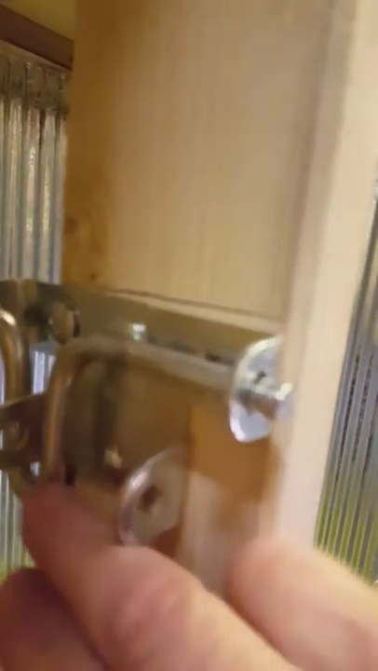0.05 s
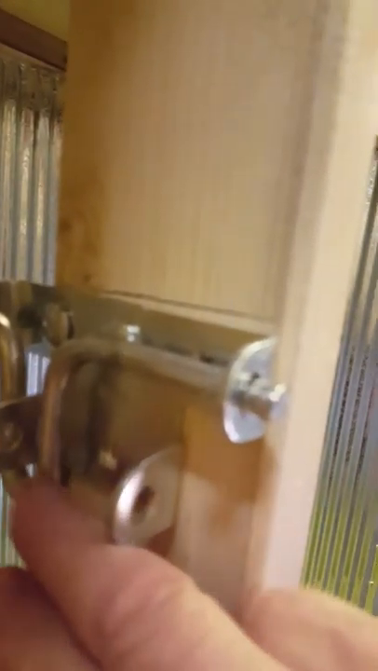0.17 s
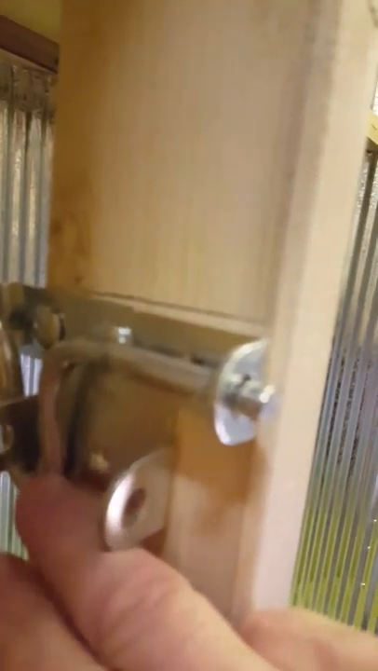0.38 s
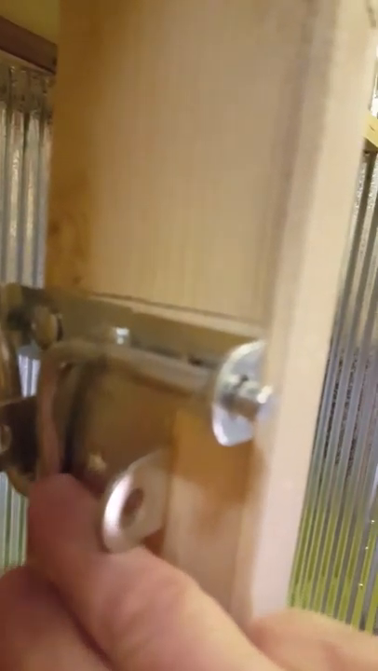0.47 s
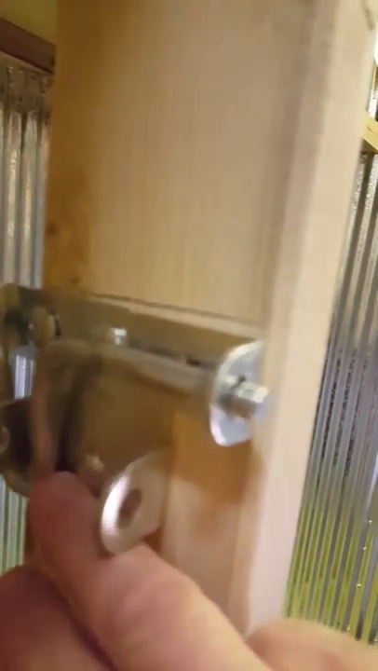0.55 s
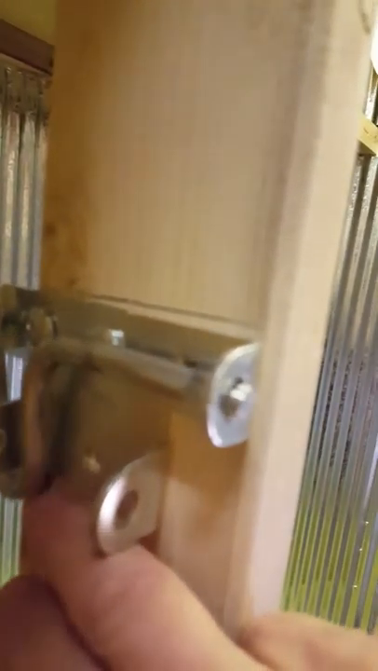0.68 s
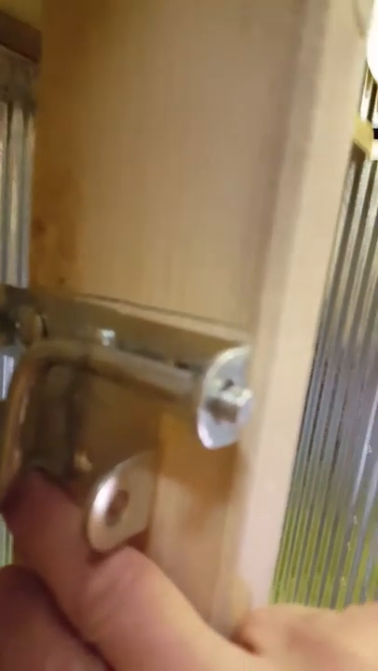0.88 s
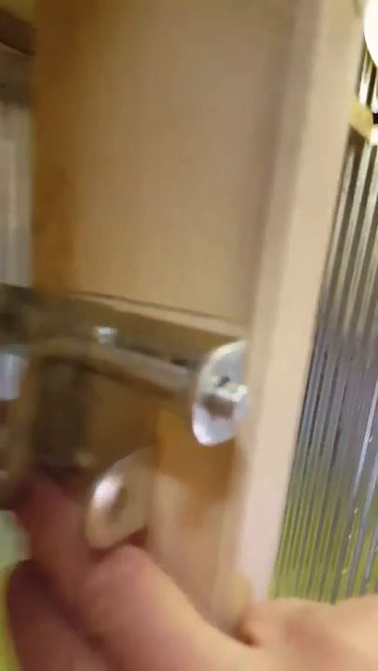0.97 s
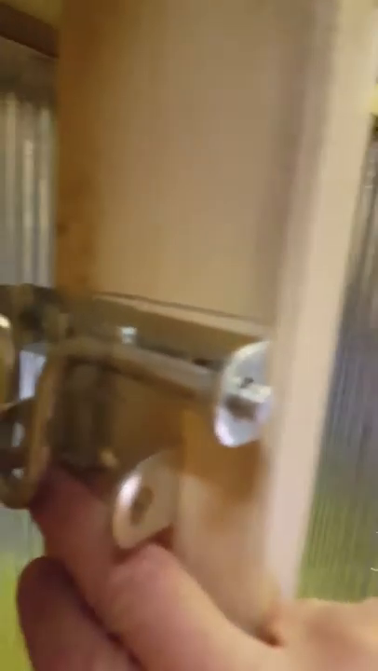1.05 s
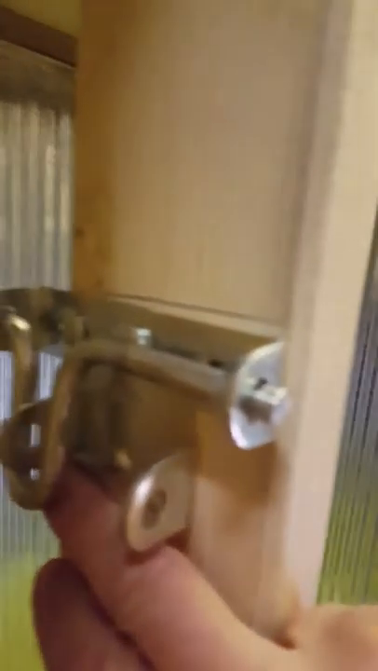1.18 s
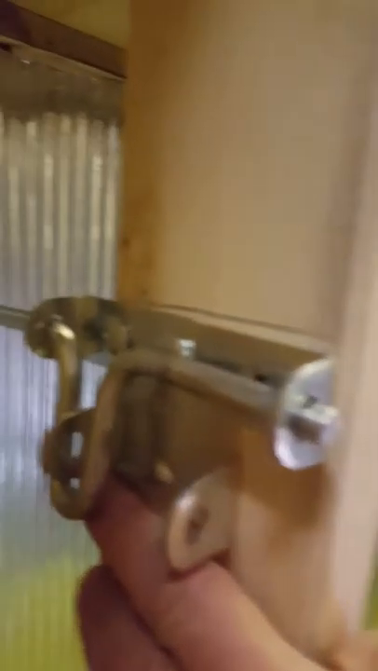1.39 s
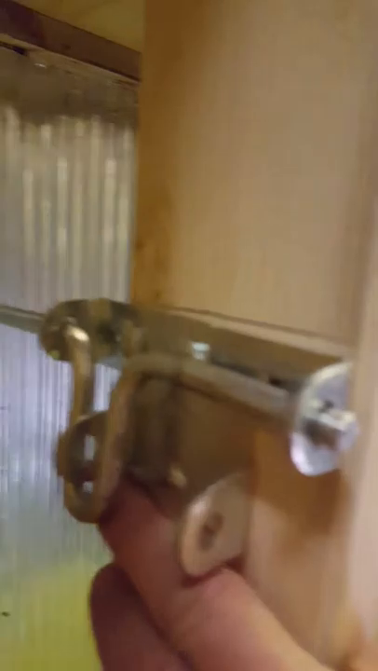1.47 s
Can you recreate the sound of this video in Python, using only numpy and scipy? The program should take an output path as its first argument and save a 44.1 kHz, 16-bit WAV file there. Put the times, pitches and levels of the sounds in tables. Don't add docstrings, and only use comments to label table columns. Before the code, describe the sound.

A steel bolt latch on a wooden gate, heard close in a small quiet room with low hum and faint hiss. After a tiny scrape, a loud bright clack rings at 0.2 s with a board knock. From 0.47 to 0.58 s, softer metal clicks and wooden knocks rattle, then the gate drags dully until 0.73 s. Soft finger rubs, strongest near 0.93 s and again around 1.08 s, end it.

```python
import sys
import numpy as np
from scipy import signal
from scipy.fft import rfft, irfft, next_fast_len
from scipy.io import wavfile
from scipy.ndimage import uniform_filter1d, map_coordinates

SR = 44100
rng = np.random.default_rng(int(sys.argv[2]) if len(sys.argv) > 2 else 0)


def magnitude_from_level(level_db):
    exponent = np.asarray(level_db, float) / 20
    return 10 ** exponent


def master(y):
    cut = np.clip(np.atleast_2d(y).T, -1, 1)
    pcm = np.round(cut * 32767)
    wavfile.write(sys.argv[1], SR, pcm.astype(np.int16))


N = 66150

# (time [s], level [dB])
HUM_COLOUR = [(12, -31), (20, -4.5), (145, -2), (208, -2.5), (441, -15.5), (479, -15.5), (1000, -26.5),
              (1300, -48), (2200, -120)]
HUM_LEVEL = [(0, -52), (.04, -59), (.15, -63), (.45, -59.5), (1.099, -62), (1.5, -65.5)]
# (frequency [Hz], left-right likeness [-1 to 1])
HISS_COLOUR = [(600, -30), (950, -8), (1350, -6), (5000, -20), (9200, -24), (12500, -16), (15600, -16),
               (16000, -50)]
HISS_ALIKE = [(60, 0.0024), (240, 0.51), (950, -1.3), (3770, 0.35), (15000, -1)]
HISS_DB = -68.5

# (time [s], steel level [dB], wood level [dB], hardness [Hz], freedom to ring [0-1])
CONTACTS = [(0.173, -51.5, -63, 5000, 0.47), (0.207, -9, -26.5, 15100, 0.95),
            (.221, -26.5, -23, 3020, 0.79), (.4682, -32.5, -40, 11130, 0.54),
            (0.4764, -31, -34, 8720, 0.62), (0.4998, -26.5, -26, 2830, 0.61),
            (.506, -67.5, -26, 3000, 0.44), (.5205, -33.5, -23.5, 6750, 0.56),
            (.539, -32.5, -30.5, 8730, .2), (0.5474, -24.5, -33, 4630, 0.55), (0.566, -47, -38, 8840, 0.8),
            (.583, -60, -45.5, 2950, 1), (.969, -50.5, -77.5, 4530, 0.52)]
# (frequency [Hz], level [dB], t60 [s])
STEEL_MODES = [(1032, -5, .1), (1125, -2, .16), (1265, -6, .08), (1505, -6, .09), (1878, 1, .22),
               (2232, -3, .14), (2406, -9, .14), (2610, 0, .11), (2885, -7, .1), (3150, -7, .18),
               (3345, -2, .09), (3988, -4, .1), (6200, -3, .08), (7150, -8, .09)]
WOOD_MODES = [(135.7, -15.5, .2), (235.9, -18.5, 0.28), (274.2, -15.5, 0.15), (347.4, -19.5, 0.31),
              (403.6, 7, 0.069), (431.7, -9, 0.1), (456, -6, .08), (600.5, -6.5, 0.073), (714, -7, 0.057),
              (877, -17.5, 0.065)]
# (frequency [Hz], density [dB per Hz])
CLANG_COLOUR = [(100, -38.5), (200, -10.5), (400, -13), (1100, -11), (3000, -9), (6400, -17),
                (12000, -17.5), (16000, -30.5)]
# (frequency [Hz], t60 [s])
CLANG_T60 = [(200, 0.33), (1000, 0.17), (3000, 0.18), (6000, 0.063), (12000, 0.11)]
# (frequency [Hz], left-right likeness [-1 to 1])
CLANG_ALIKE = [(150, 1), (500, 1), (1200, -0.033), (4000, -0.039), (8000, .2)]
# (frequency [Hz], left minus right [dB])
CLANG_PAN = [(200, 2.5), (1300, -2), (2400, 1), (5000, -3.5), (9000, -5), (13000, -1.5)]
CLANG_DB, STEEL_MODES_DB, CRACK_DB = -9.5, -12, 2.5
CRACK_T60_S, CLANG_ATTACK_S, MODE_ATTACK_S = 0.0086, 0.00039, 0.0021
TWIN_HZ, TWIN_DB = -15, -9.5
MODE_SCATTER_DB = 1.5
STEEL_LAG_S, WOOD_LAG_S, WOOD_PAN_DB = 0.00023, 0.0001, 3
LIGHT_STEEL_HZ, LIGHT_WOOD_HZ = 830, 567

# (start [s], length [s], level [dB])
SLIDES = [(.173, 0.03, -62), (0.466, 0.15, -44.5), (0.577, 0.17, -67), (.72, 0.095, -71.5),
          (.968, .04, -74.5)]
# (frequency [Hz], density [dB per Hz])
SLIDE_COLOUR = [(150, -28.5), (400, 0), (700, -8.5), (1200, -12.5), (2800, -16.5), (6000, -34),
                (12500, -53), (16000, -54)]
SING_DB, SING_WIDE_HZ = 11, 90
SLIPS_PER_S = 1100

# (frequency [Hz], t60 [s])
ROOM_T60 = [(200, 0.35), (2000, 0.21), (10000, .25)]
ROOM_DB = -15.5

# (start [s], length [s], level [dB])
DRAGS = [
    (.56, 0.085, -47),
    (.63, 0.084, -48),
]
# (frequency [Hz], density [dB per Hz])
DRAG_COLOUR = [(200, -30), (400, -3.5), (440, 4.5), (560, -3.5), (750, -17), (1100, -27), (3000, -39),
               (6000, -78.5)]

# (start [s], rise [s], fall [s], level [dB], left minus right [dB])
RUBS = [
    (0.719, 0.064, 0.061, -59.5, 13),
    (.86, 0.0757, 0.0125, -43, 6),
    (1.018, 0.061, 0.038, -49, 11),
    (1.19, 0.025, .03, -74, 4.5),
]
# (frequency [Hz], density [dB per Hz])
RUB_COLOUR = [(200, -15), (600, -5.5), (840, 0.5), (1300, -11.5), (1800, -25), (6000, -36.5), (15400, -42),
              (16000, -73)]
RUB_START_DB = -11

NOTCH_HZ, NOTCH_WIDE_HZ, NOTCH_DEPTH = 9045, 2050, 0.9
TOP_HZ = 16300


def unit(x):
    return x / np.sqrt(np.mean(x ** 2) + 1e-20)


def along(points, hz):
    f, value = np.transpose(points)
    return np.interp(np.log(hz + 1), np.log(f + 1), value)


def filtered(x, response):
    m = next_fast_len(x.shape[-1] + 8192)
    return irfft(rfft(x, m) * response(np.fft.rfftfreq(m, 1 / SR)), m)[..., :x.shape[-1]]


def pair(x, colour, alike, pan=((1000, 0),)):
    def mid_side(hz):
        angle = np.arccos(np.clip(along(alike, hz), -1, 1)) / 2
        return magnitude_from_level(along(colour, hz)) * np.array([np.cos(angle), np.sin(angle)])

    mid, side = filtered(x, mid_side)
    stereo = np.array([mid + side, mid - side])
    return unit(filtered(stereo, lambda hz: magnitude_from_level(along(pan, hz) * [[.5], [-.5]])))


def noise_pair(length, *looks):
    return pair(rng.standard_normal((2, length)), *looks)


def dying(x, t60s):
    hz, t, z = signal.stft(x, SR, nperseg=128)
    fade = magnitude_from_level(-60 * t / along(t60s, hz)[:, None])
    return signal.istft(z * fade, SR, nperseg=128)[1][..., :x.shape[-1]]


def grains(colour, alike):
    slips = (rng.random(N) < SLIPS_PER_S / SR).astype(float)
    strength = 1.2 + uniform_filter1d(slips, size=21) * 21
    return pair(rng.standard_normal((2, N)) * strength, colour, alike)


def strokes(rows, rise_s):
    t, level = np.arange(N) / SR, np.zeros(N)
    for start, length, db in rows:
        caught = start + rise_s
        corners = [start, caught, caught + .5 * length, caught + length]
        level += magnitude_from_level(db) * np.interp(t, corners, [0.024, 0.62, 0.85, 0.019])
    return level


def floor():
    t = np.arange(N) / SR
    sway_db = 1.8 * map_coordinates(rng.standard_normal(30), [t * 12])
    hum_db = np.interp(t, *np.transpose(HUM_LEVEL)) + sway_db
    hum = magnitude_from_level(hum_db) * noise_pair(N, HUM_COLOUR, [(60, 0.92), (500, .4)], [(100, 1.6)])
    return hum + magnitude_from_level(HISS_DB) * noise_pair(N, HISS_COLOUR, HISS_ALIKE)


def ring(modes, t, lag_s, pan):
    hz, db, t60 = np.transpose(modes)[..., None]
    sign = (-1) ** np.arange(len(modes))[:, None]
    strike_db = db + MODE_SCATTER_DB * rng.standard_normal(hz.shape)
    body = sign * magnitude_from_level(strike_db - 60 * t / t60) * (1 - np.exp(-t / MODE_ATTACK_S))
    ports = []
    for side in (.5, -.5):
        wave = np.sin(2 * np.pi * hz * (t - side * lag_s))
        ports.append((body * magnitude_from_level(side * along(pan, hz)) * wave).sum(0))
    return np.array(ports)


def steel_hit(t, hard_hz, free):
    modes = [(hz + twin * TWIN_HZ, db + twin * TWIN_DB, t60 * free)
             for twin in (0, 1) for hz, db, t60 in STEEL_MODES]
    looks = CLANG_COLOUR, CLANG_ALIKE, CLANG_PAN
    damped = [(hz, t60 * free) for hz, t60 in CLANG_T60]
    clang = magnitude_from_level(CLANG_DB) * dying(noise_pair(len(t), *looks), damped)
    crack = magnitude_from_level(CRACK_DB - 60 * t / CRACK_T60_S) * noise_pair(len(t), *looks)
    steel = (clang + crack) * (1 - np.exp(-t / CLANG_ATTACK_S))
    steel += magnitude_from_level(STEEL_MODES_DB) * ring(modes, t, STEEL_LAG_S, CLANG_PAN)
    cut_hz = LIGHT_STEEL_HZ * (1 - free) + 60
    return filtered(steel, lambda hz: (1j * hz / (cut_hz + 1j * hz) / (1 + 1j * hz / hard_hz)) ** 2)


def wood_knock(t, free):
    cut_hz = LIGHT_WOOD_HZ * (1 - free) + 20
    knock = ring(WOOD_MODES, t, WOOD_LAG_S, [(400, WOOD_PAN_DB)])
    return filtered(knock, lambda hz: (1j * hz / (cut_hz + 1j * hz)) ** 2)


def bolt():
    out, t = np.zeros((2, N + SR)), np.arange(SR // 2) / SR
    for start, steel_db, wood_db, hard_hz, free in CONTACTS:
        hit = magnitude_from_level(steel_db) * steel_hit(t, hard_hz, free) + magnitude_from_level(wood_db) * wood_knock(t, free)
        out[:, round(start * SR):][:, :len(t)] += hit
    return out[:, :N]


def slide():
    def sing(hz):
        response = 1
        for mode_hz, db, _ in STEEL_MODES:
            band = 1j * hz * SING_WIDE_HZ
            response = response + magnitude_from_level(SING_DB + db) * band / (mode_hz ** 2 - hz ** 2 + band)
        return response

    return filtered(strokes(SLIDES, 0.00313) * grains(SLIDE_COLOUR, CLANG_ALIKE), sing)


def room(x):
    tail = dying(rng.standard_normal((2, SR // 2)), ROOM_T60)
    late = np.pad(x, ((0, 0), (300, 0)))
    return signal.fftconvolve(late, tail / np.linalg.norm(tail[0]), axes=1)[:, :N]


def drag():
    return strokes(DRAGS, 0.019) * grains(DRAG_COLOUR, [(400, .9)])


def fingers():
    t, level = np.arange(N) / SR, np.zeros((2, N))
    for start, rise, fall, db, pan_db in RUBS:
        corners = [start, start + 0.014, start + rise, start + rise + fall]
        swell = np.interp(t, corners, [0, magnitude_from_level(RUB_START_DB), 1, 0])
        level += magnitude_from_level(db + pan_db * np.array([[.5], [-.5]])) * swell
    return level * grains(RUB_COLOUR, [(200, 0.99), (1000, 0.9), (5000, 0.32)])


def port_dip(hz):
    band = 1j * hz * NOTCH_WIDE_HZ
    return (1 - NOTCH_DEPTH * band / (NOTCH_HZ ** 2 - hz ** 2 + band)) ** 2


def scene():
    near = bolt() + slide() + drag() + fingers()
    return floor() + filtered(near + magnitude_from_level(ROOM_DB) * room(near), port_dip)


def roll_off(x):
    return signal.sosfilt(signal.butter(12, 16830, fs=SR, output="sos"), x)


def record(dry):
    mix = filtered(dry, lambda hz: hz < TOP_HZ)
    return roll_off(mix)


dry = scene()
out = record(dry)
master(out)
```